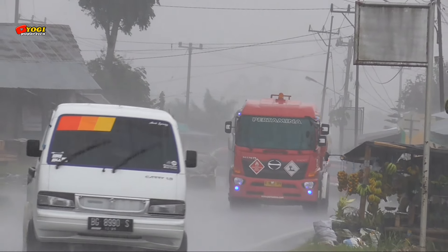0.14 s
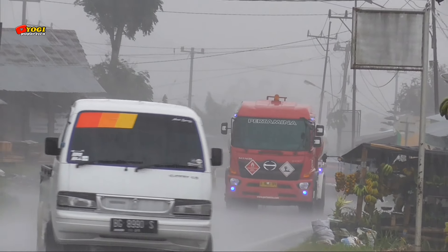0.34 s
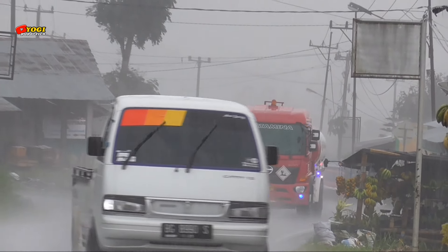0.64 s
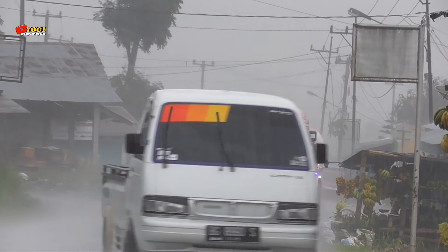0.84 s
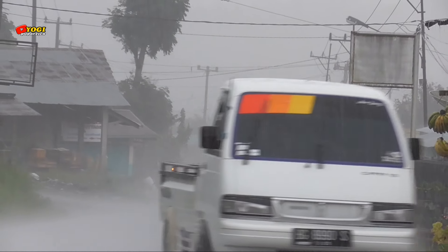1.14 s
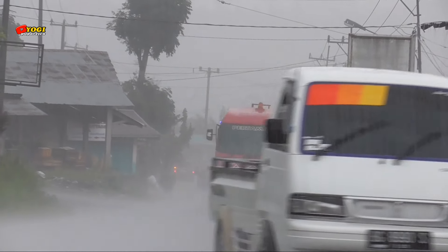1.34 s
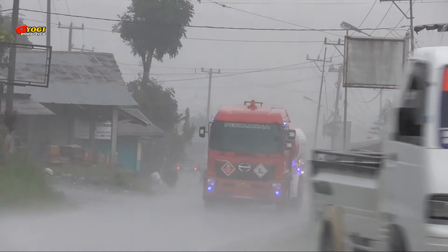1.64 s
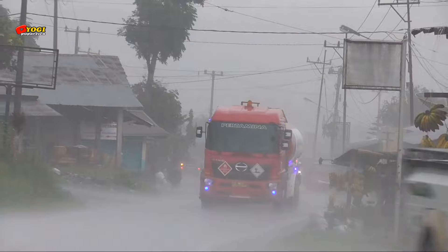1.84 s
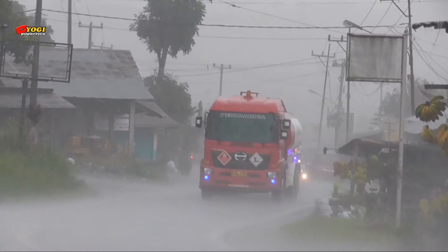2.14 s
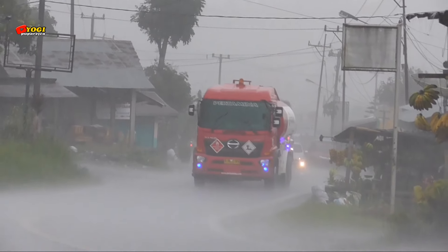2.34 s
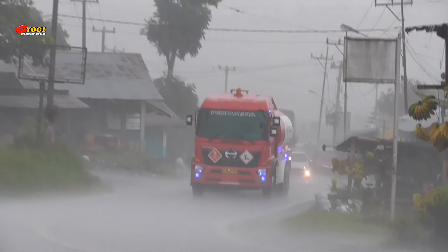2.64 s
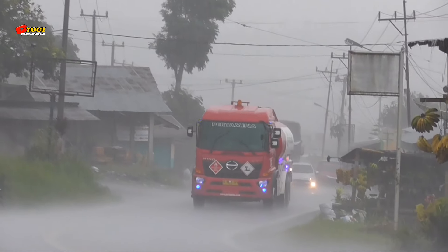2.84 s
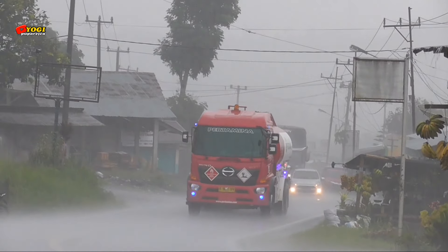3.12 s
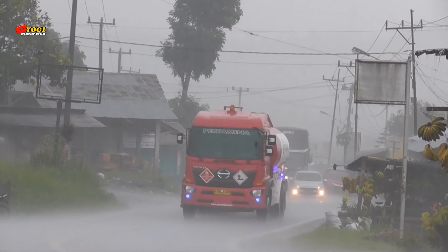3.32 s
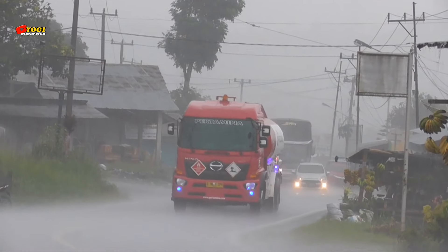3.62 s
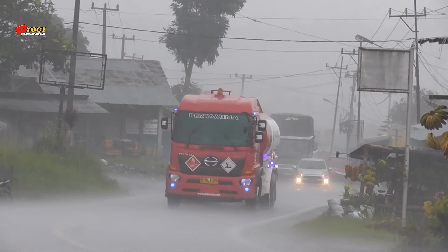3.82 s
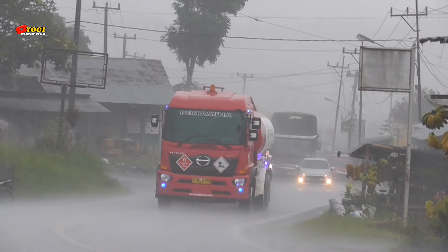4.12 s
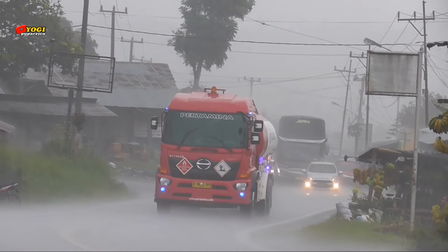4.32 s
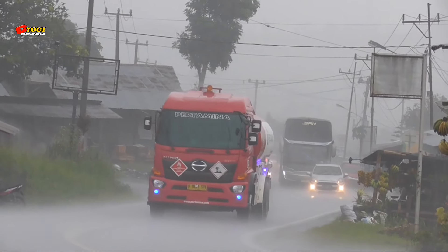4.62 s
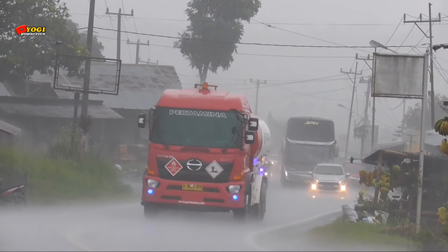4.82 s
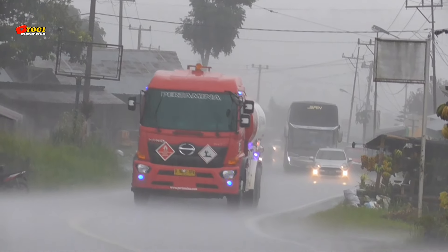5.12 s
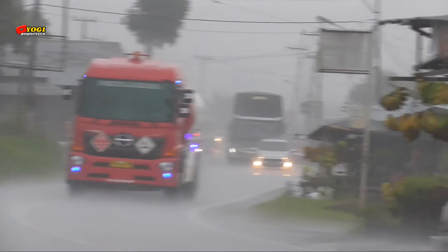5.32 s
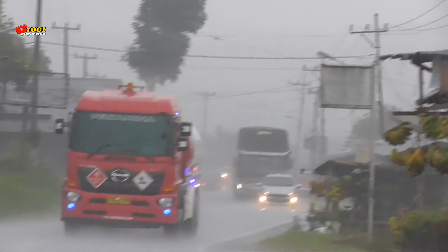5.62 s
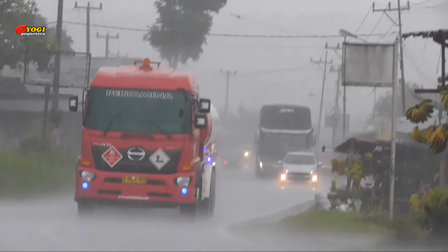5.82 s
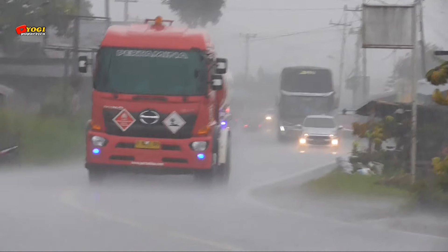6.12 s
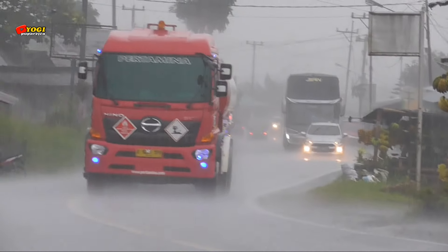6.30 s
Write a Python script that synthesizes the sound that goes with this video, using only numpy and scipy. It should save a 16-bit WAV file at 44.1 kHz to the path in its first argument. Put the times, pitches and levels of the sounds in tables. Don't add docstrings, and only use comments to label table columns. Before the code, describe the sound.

Heavy rain hisses on a wet road as a droning diesel passes close with tyre roar and spray, then another heavy vehicle approaches.

```python
import sys
import numpy as np
from scipy import signal
from scipy.fft import rfft, irfft, next_fast_len
from scipy.io import wavfile

SR = 44100
rng = np.random.default_rng(int(sys.argv[2]) if len(sys.argv) > 2 else 0)


def amplitude_ratio(level_db):
    exponent = np.asarray(level_db, float) / 20
    return 10 ** exponent


def put_to_file(sound):
    columns = np.atleast_2d(sound).T
    safe = np.clip(columns, -1, 1)
    whole_steps = np.round(safe * 32767)
    wavfile.write(sys.argv[1], SR, whole_steps.astype(np.int16))


N = 284886

# frequency in Hz, level in dB per Hz.
SPRAY_COLOUR = [(3300, -18.5), (5500, -6), (6240, -10.5), (7500, -1), (8600, 1), (9700, 1), (11000, -1.5),
                (12500, -6), (14000, -11), (15300, -14), (17000, -22)]


def clock():
    return np.arange(N) / SR


def swell(start, peak, end):
    return np.interp(clock(), [start, peak, end], [0, 1, 0])


def ramp(start, end):
    return np.interp(clock(), [start, end], [0, 1])


def in_time(rows):
    s, *columns = np.transpose(rows)
    return [np.interp(clock(), s, column) for column in columns]


def at_hz(points, hz):
    point_hz, values = np.array(points).T
    return np.interp(np.log(hz), np.log(point_hz), values)


def rms_one(x):
    return x / np.sqrt(np.mean(x ** 2) + 1e-20)


def drift(rate):
    r = np.exp(-80 * np.pi * rate / SR)
    slow = signal.lfilter([1], [1, -2 * r, r * r], rng.standard_normal(N // 40 + 2002))[2000:]
    return np.interp(np.arange(N) / 40, np.arange(len(slow)), rms_one(slow))


def resonate(x, hz, width_hz):
    r = np.exp(-np.pi * width_hz / SR)
    top = np.array([1, 0, -1]) * (1 - r * r) / 2
    return signal.lfilter(top, [1, -2 * r * np.cos(2 * np.pi * hz / SR), r * r], x)


def shaped(x, gain_db):
    size = next_fast_len(N)
    hz = np.maximum(np.arange(size // 2 + 1) * SR / size, 1)
    return irfft(rfft(x, size) * amplitude_ratio(gain_db(hz)), size)[..., :N]


def panned(x, pan_db):
    return x * amplitude_ratio(np.array([[.5], [-.5]]) * pan_db)


def widened(mid, side):
    return mid + side * [[1], [-1]]


def coloured(source, spectrum, patchy_db, gust_db, closer=0, bright_db=0):
    # frequency in Hz, left-right likeness from 0 to 1.
    likeness = [(30, 1), (125, 0.89), (400, 0.87), (1000, 0.76), (2500, 0.43), (5000, 0.14), (9000, 0.056),
                (14000, 0.05)]
    out, gust = 0, gust_db * (drift(3.7) + drift(40))
    bottom, top = spectrum[0][0], spectrum[-1][0]
    edges = np.geomspace(bottom, top, int(3 * np.log2(top / bottom)) + 2)
    for k, (low, high) in enumerate(zip(edges, edges[1:])):
        band = signal.butter(2, [low, high], "band", fs=SR, output="sos")
        mid, side = signal.sosfilt(band, source[k % 2])
        alike = np.clip(at_hz(likeness, np.sqrt(low * high)) + closer, 0, 1)
        octaves_up = max(np.log2(high / 10000), 0)
        gain = amplitude_ratio(gust + patchy_db * drift(9.1) + bright_db * octaves_up)
        out = out + gain * widened(np.sqrt(1 + alike) * mid, np.sqrt(1 - alike) * side)
    return rms_one(shaped(out, lambda hz: at_hz(spectrum, hz)))


def firing_rate():
    coming_hz, going_hz, pass_s, pass_width_s = 82.6, 75.85, 3.37, .3
    still_coming = (1 - np.tanh((clock() - pass_s) / pass_width_s)) / 2
    driver_lift = -1.0 * swell(4.4, 5.18, 5.35)
    return going_hz + (coming_hz - going_hz) * still_coming + driver_lift


def engine():
    # time in seconds, second harmonic in dB, third harmonic in dB.
    boom = [(0, -13, -25), (.85, -9.5, -21), (1.3, -11, -25.5), (1.95, -10, -35), (2.5, -11, -22.5),
            (2.7, -6.5, -20), (3.15, -5, -22), (3.6, -9, -15.5), (3.73, -17.5, -22), (3.87, -12.5, -10.5),
            (4.08, -20.5, -20), (4.22, -26.5, -12), (4.75, -26.5, -12), (5.3, -17, -13.5),
            (5.55, -18, -21.5), (5.92, -15.5, -16.5), (6.08, -23, -20), (6.46, -25.5, -24)]
    # multiple of the firing rate, level in dB.
    orders = [(1.751, -39), (2.25, -30.5), (2.5, -31), (2.75, -29), (3.248, -35.5), (3.5, -42.5),
              (5, -36.5)]
    second_db, third_db = in_time(boom)
    turns = 2 * np.pi * np.cumsum(firing_rate() * (1 + .0015 * drift(8))) / SR
    near_db = 10 * np.log10(amplitude_ratio(2 * second_db) + amplitude_ratio(2 * third_db)) + 10
    first_db = -47.5 + 15 * swell(2.2, 4, 5.3)
    fourth_db = -34 + .4 * near_db + 8.5 * swell(1.2, 3.07, 3.04)
    lines = [(1, first_db, 1.3), (2, second_db + drift(2.5), 0.84), (3, third_db, 1.1), (4, fourth_db, 0.92)]
    lines += [(k, db + 1.5 + 0.89 * near_db, 2.0) for k, db in orders]
    out = np.zeros((2, N))
    for k, level_db, waver_db in lines:
        phase = k * turns + rng.uniform(0, 2 * np.pi) + 0.13 * waver_db * drift(3.6)
        skew = (0.033 * k + .02 * k * drift(2)) * [[1], [-1]]
        out += np.sqrt(2) * amplitude_ratio(level_db + waver_db * drift(8.5)) * np.sin(phase + skew)
    return out


def tread(white):
    # frequency in Hz, width in Hz, level in dB.
    resonances = [(985, 70, -29), (1205, 80, -33), (700, 90, -32), (1880, 150, -38), (3000, 180, -42)]
    t = clock()
    ringing = sum(amplitude_ratio(db) * rms_one(resonate(white, hz, width_hz)) for hz, width_hz, db in resonances)
    leaving, coming = amplitude_ratio(-6 * t), amplitude_ratio(-1.5 + 4.5 * (t - t[-1]))
    return (leaving + coming) * widened(ringing[0], 0.41 * ringing[1])


def tyres():
    # time in seconds, roar in dB.
    traffic = [
        (0, -20),
        (.5, -20),
        (1.1, -22),
        (2.3, -26.5),
        (2.85, -27.5),
        (3.2, -28.5),
        (3.5, -26),
        (3.9, -20),
        (6.46, -19.5),
    ]
    # frequency in Hz, level in dB per Hz.
    rumble_colour = [(26, -54), (45, -32), (102, -6), (123, -9.5), (146, 2), (242, 0), (279, -4), (300, 1),
                     (390, -28), (660, -120)]
    # frequency in Hz, level in dB per Hz.
    roar_colour = [(150, -26), (260, -8), (290, -7.5), (365, 1.5), (430, -3.5), (490, -7.5), (590, -16),
                   (700, -4), (980, -10), (1290, -9), (1690, -23), (2000, -18), (2600, -27.5), (3400, -61)]
    roar_db = in_time(traffic)[0]
    near_db = roar_db + 20
    white = rng.standard_normal((2, 2, N))
    rumble = coloured(white, rumble_colour, patchy_db=0.5, gust_db=-0.4)
    rumble = amplitude_ratio(-34 + 0.38 * near_db + 12.0) * rumble
    roar = amplitude_ratio(roar_db + 3.5) * coloured(white[::-1], roar_colour, patchy_db=1.27, gust_db=0.07)
    growl = rms_one(resonate(white[0, ::-1], hz=553, width_hz=130))
    growl = amplitude_ratio(-27 + 1.13 * near_db) * growl
    return rumble + roar + widened(growl[0], 0.69 * growl[1]) + tread(white[1])


def patter(per_s, spread_db):
    shape = (2, 2, N)
    sizes = amplitude_ratio(spread_db * np.minimum(rng.exponential(1, shape), 6)) * rng.choice([-1, 1], shape)
    return rms_one(sizes * (rng.random(shape) < per_s / SR))


def echoed(x, share, delay_ms):
    out, now = x.copy(), np.arange(N)
    for channel, stretch, weight in [(0, 1, 1), (0, 2.3, 0.47), (1, 1.12, 0.88), (1, 2.7, 0.54)]:
        late = np.round(now - stretch * delay_ms * SR / 1000).astype(int).clip(0)
        out[channel] += weight * share * x[channel][late]
    return out / np.sqrt(1 + 1.3 * share ** 2)


def rain_and_spray():
    # frequency in Hz, level in dB per Hz.
    splash_colour = [(880, -63), (1500, -2.5), (1940, -6), (2720, -8), (3720, -4), (4780, -9.5),
                     (5370, -16.5), (6500, -11.5), (8450, -20), (14300, -120)]
    t, near = clock(), swell(-.5, 2.3, 3.05)
    duck_db = -11 * np.interp(t, [2.9, 3.218, 3.42, 3.95], [0, 0.95, 0.57, 0.011])
    rain_db = 0.27 * t + duck_db
    wake_db = 6 * np.interp(t, [.9, 1.75, 2.45, 2.948], [0.28, 0.95, 0.85, 0])
    spray_db, splash_db = -30 + rain_db + wake_db, -30 + rain_db + 0.38 * wake_db
    closer = 0.34 * near
    bright_db = 0.37 * t - 2 * swell(0, 1.8, 5.5)
    splash = coloured(rng.standard_normal((2, 2, N)), splash_colour, patchy_db=0.77, gust_db=0.5,
                      closer=closer)
    spray = coloured(patter(per_s=8000, spread_db=2.5), SPRAY_COLOUR, patchy_db=1.0, gust_db=0.43,
                     closer=closer, bright_db=bright_db)
    hiss = amplitude_ratio(splash_db + 1.0) * splash + amplitude_ratio(spray_db + 2.5) * spray
    hiss = echoed(hiss, share=0.04 + 0.24 * near, delay_ms=1.24 + .07 * t)
    ticks_db = spray_db - 10 - 12 * (1 - ramp(2.8, 4.1))
    return hiss + amplitude_ratio(ticks_db) * small_drops(per_s=120., spread_db=9.0)


def whistle():
    t = clock()
    hz = 4870 - 200 * np.maximum(t - 1.5, 0)
    level_db = -40 + 10 * swell(2.37, 2.42, 2.5) - 26 * np.maximum(t - 2.45, 0)
    width = signal.butter(2, 84, fs=SR, output="sos")
    low = signal.sosfilt(width, rng.standard_normal((2, N)))
    turns = 2 * np.pi * np.cumsum(hz) / SR
    band = low[0] * np.cos(turns) + low[1] * np.sin(turns)
    return panned(amplitude_ratio(level_db) * rms_one(band), 4.0)


def near_drops():
    # time in seconds, peak in dB, ring in Hz, left-right difference in dB.
    landings = [(1.2136, -15, 9400, 0.0), (3.6875, -12, 11110, 0.0), (3.8601, -9.5, 8670, -7),
                (4.041, -5, 9050, -0.5), (4.126, -9, 9800, 0.0), (4.2383, -7, 10900, 1),
                (4.388, -8, 8700, 0.0), (4.4225, -3.5, 8190, 6), (4.541, -21, 9360, -0.5),
                (4.6853, -14, 8460, 0.0), (4.7272, -18, 9370, -0.5), (5.0028, -4, 7440, 4),
                (5.0878, -7, 9100, -1.0), (5.2205, -12, 8630, 0.0), (5.24, -3, 9280, 3),
                (5.3058, -8, 10500, -1.5), (5.7364, -8.5, 8430, 2), (5.7503, -7, 8910, 0.0),
                (5.8546, -9, 8250, 1.0), (5.9798, -13, 7910, -0.5), (6.083, -4, 9970, 0.5),
                (6.1065, -9, 8180, 0.0), (6.1464, -10, 9840, -1.5), (6.2297, -16, 9200, 0.0),
                (6.2567, -5, 10100, -0.5), (6.2891, -8, 9160, -1.0), (6.3609, -7, 8560, 0.0),
                (6.4462, 1, 9230, -0.5)]
    length = 400
    out, t = np.zeros((2, N + length)), np.arange(length) / SR
    for (s, db, hz, pan_db), noise in zip(landings, rng.standard_normal((len(landings), length))):
        tick = np.sin(2 * np.pi * 1.04 * hz * t) * t / .00005 * np.exp(-t / .00007)
        fizz = resonate(noise, hz, width_hz=1900) * np.exp(-t / 0.0013)
        at = int((s + 0.00064) * SR)
        out[:, at:at + length] += panned(amplitude_ratio(db + 6.5) * (tick + 0.35 * fizz), pan_db)
    no_thump = signal.butter(3, 6000, "high", fs=SR, output="sos")
    return signal.sosfilt(no_thump, out[:, :N] + 1e-18)


def small_drops(per_s, spread_db):
    sizes = amplitude_ratio(spread_db * np.minimum(rng.exponential(1, N), 2.6)) * (rng.random(N) < per_s / SR)
    placed = panned(sizes * rng.choice([-1, 1], N), rng.normal(0, 7.2, N))
    return rms_one(shaped(placed, lambda hz: at_hz(SPRAY_COLOUR, hz) + 3.0 * np.log2(hz / 9000)))


def truck():
    idle_db = -37.5 + 16 * np.minimum(clock() - 5.4, 0)
    idle = np.sqrt(2) * np.sin(2 * np.pi * 62.9 * clock() + .8 * drift(3))
    deep_band = signal.butter(2, [40, 64], "band", fs=SR, output="sos")
    mid, side = signal.sosfilt(deep_band, rng.standard_normal((2, N)))
    deep = amplitude_ratio(-51 + 5 * ramp(3.2, 5.3)) * rms_one(widened(mid, .35 * side))
    return amplitude_ratio(idle_db + 1.5 * drift(4)) * idle + deep


def scene():
    return engine() + tyres() + rain_and_spray() + whistle() + near_drops() + truck()


def two_ports(x):
    # frequency in Hz, left-right difference in dB.
    port_balance = [(60, -3), (100, 2), (160, 0.2), (270, 2), (450, -4), (740, 2), (1220, 1), (2010, 0),
                    (3330, -0.2), (5500, 2.5), (9080, 0.5), (15000, -5)]
    return shaped(x, lambda hz: at_hz(port_balance, hz) * [[.5], [-.5]])


def thinned(x):
    # frequency in Hz, chance of silence from 0 to 1.
    silence = [(4000, 0), (5300, .05), (5700, .02), (6200, .09), (6700, 0), (12500, 0), (13500, .08),
               (14500, .25), (15150, .38), (15250, .75), (15440, .85), (15490, 1)]
    hz, _, cells = signal.stft(x, SR, nperseg=1024)
    frames = cells.shape[-1]
    draws = rng.random((len(hz) // 4 + 1, frames // 2 + 1)).repeat(4, 0).repeat(2, 1)
    kept = draws[:len(hz), :frames] >= at_hz(silence, hz + 1)[:, None]
    return signal.istft(cells * kept, SR, nperseg=1024)[1][:, :N]


def low_pass(x):
    return signal.sosfilt(signal.butter(12, 15680, fs=SR, output="sos"), x)


def record(dry):
    mix = np.clip(thinned(two_ports(dry)) * .97, -1, 1)
    return low_pass(mix)


dry = scene()
out = record(dry)
put_to_file(out)
```